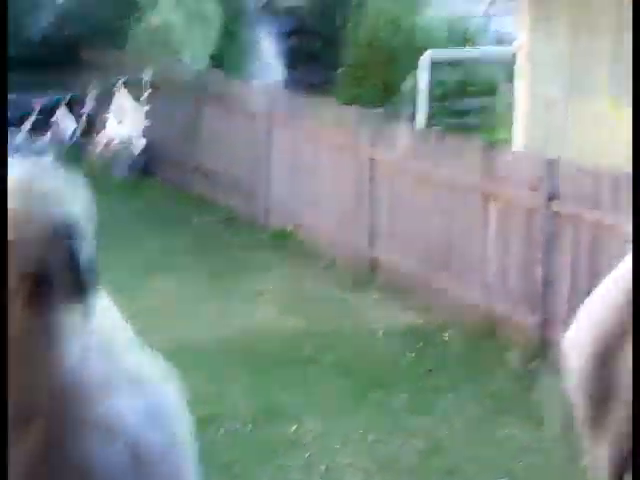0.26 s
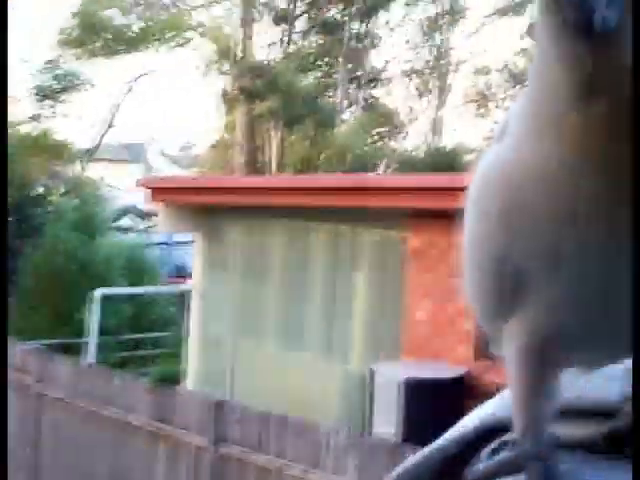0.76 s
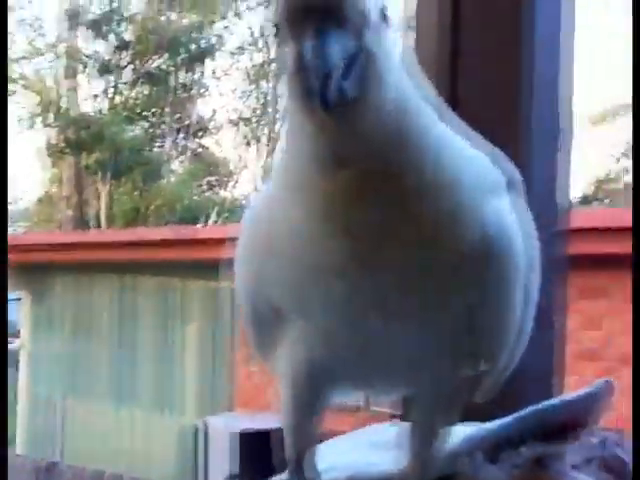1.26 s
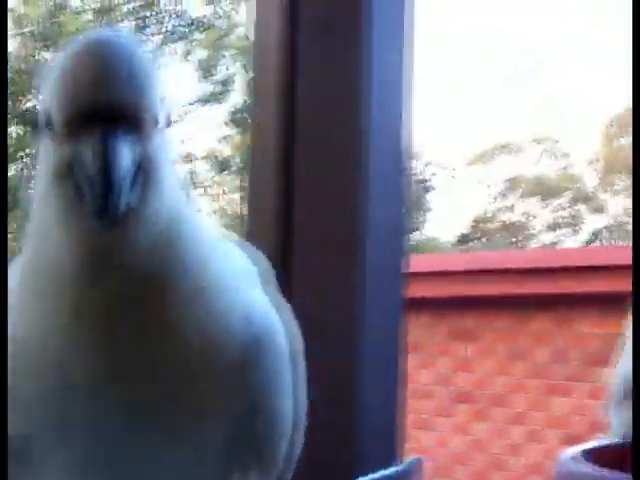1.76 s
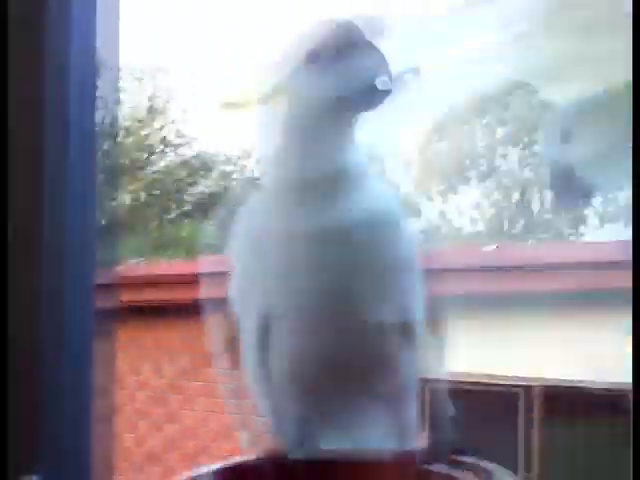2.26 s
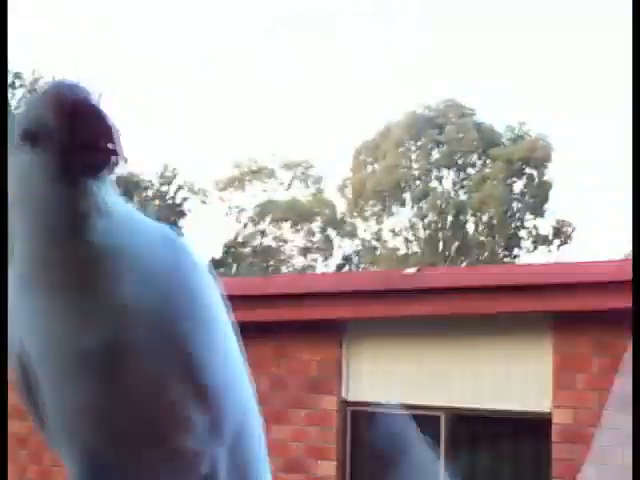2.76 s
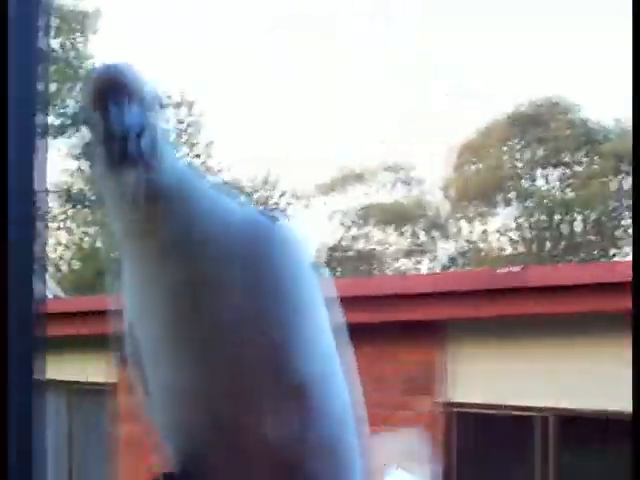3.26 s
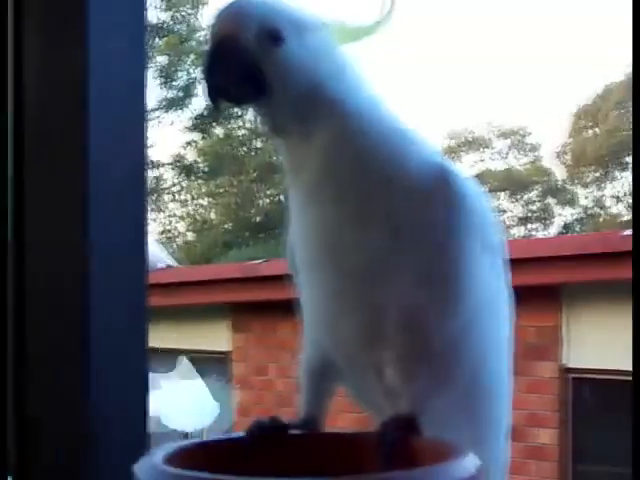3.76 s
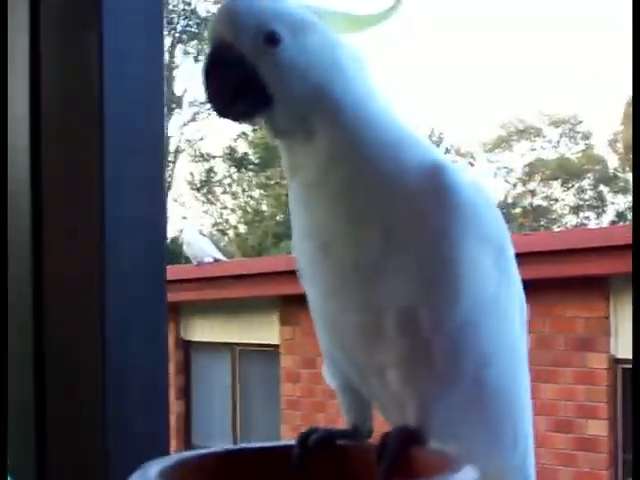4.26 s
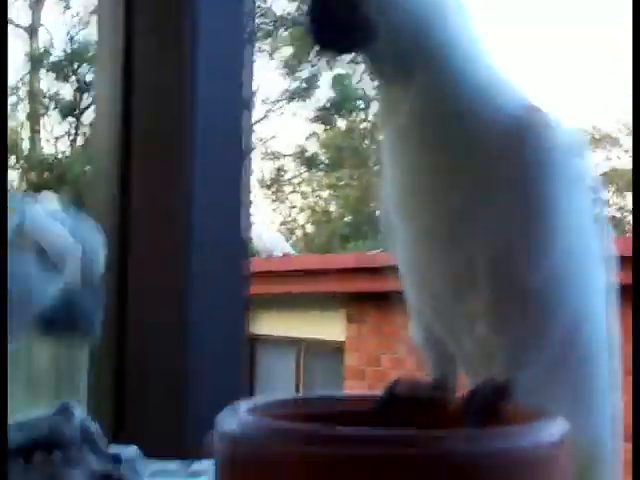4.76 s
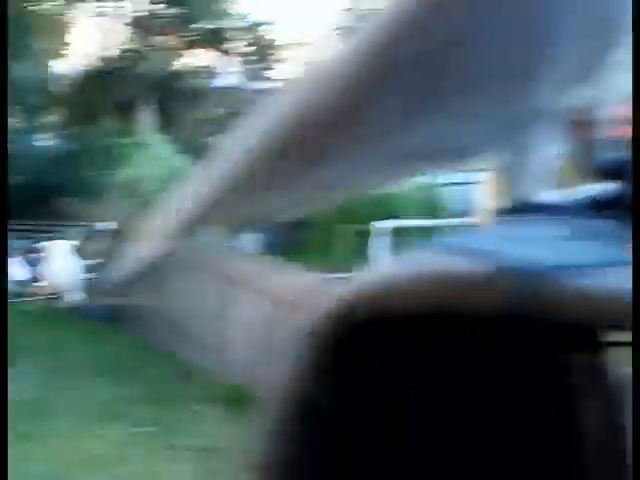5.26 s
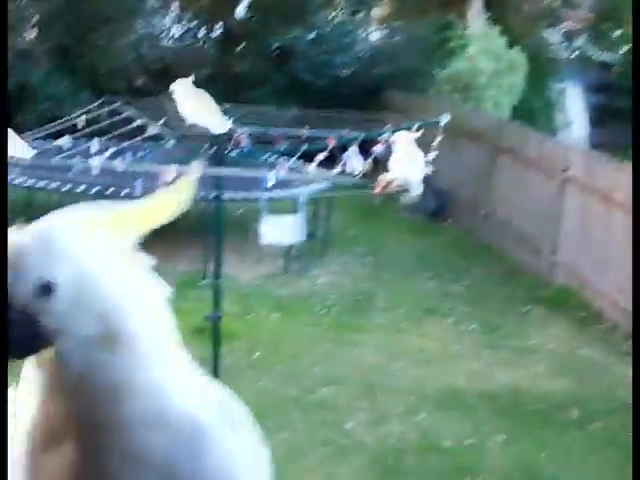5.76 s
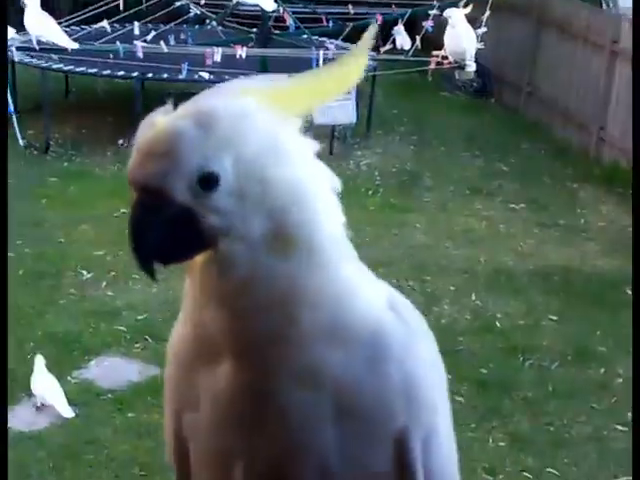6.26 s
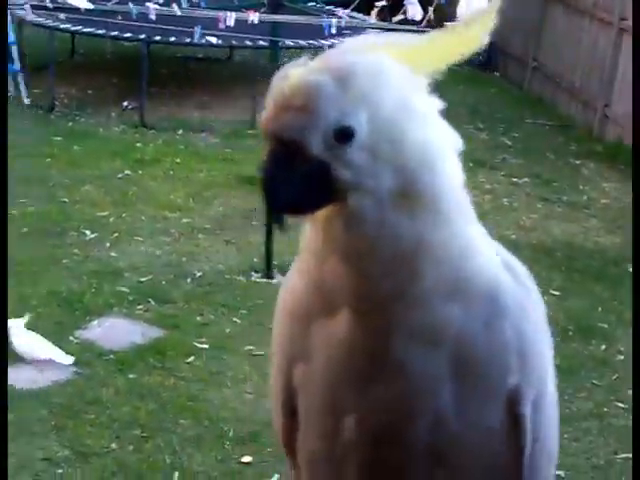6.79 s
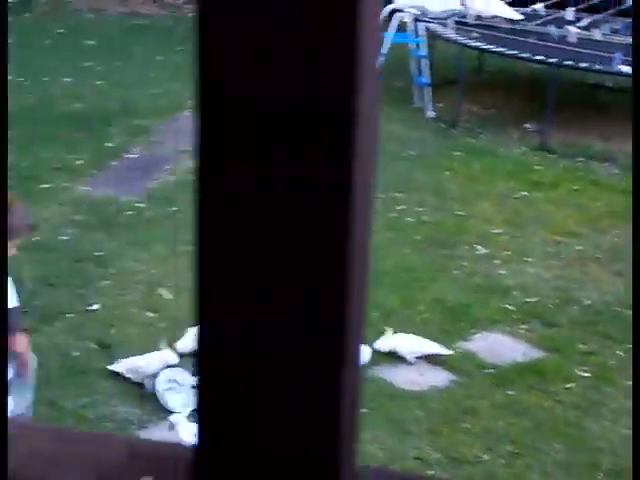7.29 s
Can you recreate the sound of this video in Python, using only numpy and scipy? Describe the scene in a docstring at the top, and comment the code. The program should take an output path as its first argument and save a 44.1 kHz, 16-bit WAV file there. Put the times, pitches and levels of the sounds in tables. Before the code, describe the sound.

Handheld, slightly dull microphone on an open veranda with a short echo. Soft feather rustle and low yard hum run throughout. Ticks and a bright pot strike lead to a single raspy cockatoo scream that overloads the input, then a big wing whoosh and fluttering air thuds. Quiet coos and thin chirps follow farther off, with light rail taps, before rattling, booming boards and rising wind close.

```python
"""Cockatoos on a timber veranda

A flock crowds above a yard. One screeches beside the microphone and overloads it: shaky pulses and breath
through a resonant throat. Boards bang three times as rattling and booming noise; claws, beaks, rail and pot
are struck resonances; wings are swells of noise, some shoving the diaphragm. A dove coos and small birds
chirp further off as gliding tones, over shaped noise for the flock's rustle, the yard's hum and light wind."""
import sys
import numpy as np
from scipy import signal
from scipy.fft import rfft, irfft
from scipy.io import wavfile
from scipy.ndimage import uniform_filter1d

SR = 44100
rng = np.random.default_rng(int(sys.argv[2]) if len(sys.argv) > 2 else 0)


def put_to_file(sound):
    """Save the sound as 16-bit audio at rate SR, in the file named by the first command-line argument."""
    columns = np.atleast_2d(sound).T  # one column per channel
    safe = np.clip(columns, -1, 1)
    whole_steps = np.round(safe * 32767)
    wavfile.write(sys.argv[1], SR, whole_steps.astype(np.int16))


N = 332070  # samples in the scene

# Colour of feathers, claws and boards brushing: [hz, level_db]
RUSTLE_COLOUR = [(500, -31), (900, -11), (1400, -11), (2200, -9.5), (3370, -4.5), (4860, -11),
                 (6700, -20.5), (12000, -24)]


def gain_of(db):
    """Turns decibels into an amplitude factor."""
    return 10 ** (np.asarray(db) / 20)


def clock(length_s):
    """Sample times of an event in seconds."""
    return np.arange(round(length_s * SR)) / SR


def evened(x):
    """Scales to rms 1."""
    return x / np.sqrt(np.mean(x ** 2) + 1e-20)


def smoothed(x, size, axis=-1):
    """Runs a moving average twice, a roughly triangular smoothing."""
    once = uniform_filter1d(x, size=size, axis=axis)
    return uniform_filter1d(once, size=size, axis=axis)


def wobble(count, seconds):
    """Random drift of rms 1: white noise smoothed over the given time."""
    size = max(round(seconds * SR), 1)
    return evened(smoothed(rng.standard_normal(count), size))


def read(points, hz):
    """Interpolates a table over frequency on a nearly logarithmic axis."""
    f, value = np.transpose(points)
    return np.interp(np.log(hz + 1), np.log(f + 1), value)


def coloured(x, points):
    """Filters by a spectrum table."""
    hz = np.fft.rfftfreq(len(x), 1 / SR)
    return irfft(rfft(x) * gain_of(read(points, hz)), len(x))


def resonate(x, hz, width_hz):
    """Shifts hz down to zero, smooths, and shifts back: a resonance of gain 1 that can glide."""
    turn = np.exp(2j * np.pi * np.cumsum(hz * np.ones(len(x))) / SR)
    r = np.exp(-np.pi * width_hz / SR)
    return 2 * (turn * signal.lfilter([1 - r], [1, -r], x / turn)).real


def resonate_twice(x, hz, width_hz, second_width_hz):
    """Passes two resonances in a row at one pitch, for steeper sides."""
    return resonate(resonate(x, hz, width_hz), hz, second_width_hz)


def add(mix, start_s, sound):
    """Mixes a sound in at its start time."""
    part = mix[max(round(start_s * SR), 0):][:len(sound)]
    part += sound[:len(part)]


def screech():
    """A syrinx driven to chaos: shaky pulses and breath through a throat that favours two overtones."""
    start_s, hold_s, full_db = 2.009, 0.17, 3.5  # held until it lets go
    attack_s, burst_db, swell_s = .007, -10.5, .045  # bursts in below full effort, then swells
    release_db_per_s, tail_db, tail_db_per_s = 649.5, -22, 218.5  # a rasp lingers under the release
    syrinx_hz, slack_hz, upper_hz, upper_db = 1064.3, 95.1, 3165, 5
    t = clock(hold_s + 0.17)
    after = np.maximum(t - hold_s, 0)
    slack = np.maximum(1 - t / swell_s, 0)
    hz = syrinx_hz - slack_hz * slack  # pitch tightens with the swell
    release_db = np.maximum(-release_db_per_s * after, tail_db - tail_db_per_s * after)
    effort_db = full_db + burst_db * slack + release_db
    turns = np.cumsum(hz * (1 + .08 * wobble(len(hz), .002))) / SR
    folds = sum(np.cos(2 * np.pi * k * turns) for k in range(2, 8))  # no fundamental
    folds = folds * gain_of(5.8 * wobble(len(hz), .0005))
    drive = evened(folds) + 1.5 * rng.standard_normal(len(hz))  # breath added
    throat = resonate_twice(drive, 2 * hz, 520, 520)
    throat -= gain_of(upper_db) * resonate_twice(drive, upper_hz, 700, 650)
    throat += gain_of(-12.0) * resonate(drive, 4200, 900)
    throat += gain_of(-6.5) * resonate(drive, 1200, 1400)
    attack = np.minimum(t / attack_s, 1) ** 2
    return start_s, attack * gain_of(effort_db) * evened(throat)


def bang(start_s, rattle_db, boom_db, t60_s):
    """Loose boards: a rattle with a ring in it, over a longer-lasting boom."""
    # Colour of the boom: [hz, density_db_per_hz]
    boom_colour = [(35, -26), (60, -24), (194, -6.5), (429, 4), (558, -6.5), (618, -4.5), (1030, -10),
                   (2000, -19), (2600, -47), (4400, -120)]
    t = clock(.5)
    noise = rng.standard_normal((2, len(t)))
    rattle = evened(coloured(noise[0], RUSTLE_COLOUR))
    rattle += gain_of(-7) * evened(resonate(rattle, 3060, 230))  # the boards ring here
    rattle *= gain_of(rattle_db - 60 * t / t60_s + 0.92 * wobble(len(t), 0.0014))
    boom = evened(coloured(noise[1], boom_colour)) * gain_of(boom_db - 60 * t / (1.84 * t60_s))
    return start_s, rattle * np.minimum(t / 0.0066, 1) + boom * np.minimum(t / 0.0031, 1)


def pot(start_s, peak_db, contact_s, hardness_db):
    """Gritty contact feeds the clay's modes; each answers broadly, then rings on thinly, its level wavering."""
    # Modes of the pot: [hz, level_db, t60_s]
    pot_modes = [(685, -3, 0.15), (1100, 18, 0.65), (1300, 7, 0.12), (2250, 7, .1), (3250, 6.5, 1),
                 (3280, 7, .2), (4330, -16, .15)]
    t = clock(.4)
    grit = rng.standard_normal(len(t)) * (t < contact_s) * gain_of(5.6 * wobble(len(t), 0.0051))
    grit[:20] += 3.7 * np.hanning(20)  # the first touch
    free = 0.00077 / contact_s  # a long scrape holds the ring down
    out = np.zeros(len(t))
    for hz, db, t60_s in pot_modes:
        long_ring = free * gain_of(-60 * t / t60_s + 6.1 * wobble(len(t), 0.0044))
        ring = (gain_of(-60 * t / 0.062) + long_ring) * np.sin(2 * np.pi * hz * t)
        tilt_db = hardness_db * np.log2(hz / 1068)
        out += gain_of(db + tilt_db) * signal.fftconvolve(grit, ring)[:len(t)]
    return start_s, gain_of(peak_db) * out / abs(out).max()


def gust(peak_s, level_db, eddy_hz, fall_db_per_s):
    """Wing beats push air at the diaphragm: slow eddies evened to similar force, then smoothed."""
    rise_db_per_s, hold_s = 600, 0.029
    t = clock(.35) - .08  # zero at the peak
    fall_db = -fall_db_per_s * np.maximum(t - hold_s, 0)
    level_db = level_db + np.minimum(rise_db_per_s * t, fall_db)
    eddies = resonate_twice(rng.standard_normal(len(t)), eddy_hz, 3.0 * eddy_hz, 1.7 * eddy_hz)
    eddies /= np.sqrt(smoothed(eddies ** 2, 900) + 1e-12)
    smooth = signal.lfilter(*signal.butter(3, 120, fs=SR), eddies)
    return peak_s + t[0], gain_of(level_db) * smooth * signal.windows.tukey(len(t), .15)


def tap(start_s, level_db, ring_hz, t60_s):
    """A tick of claw or beak: a scratch with a loose ring and a quieter tail."""
    t = clock(.2)
    noise = rng.standard_normal((2, len(t)))
    ring = evened(resonate_twice(noise[1], ring_hz, 0.38 * ring_hz, 0.38 * ring_hz))
    scratch = .5 * evened(coloured(noise[0], RUSTLE_COLOUR)) + ring
    decay = gain_of(-60 * t / 0.02) + .5 * gain_of(-60 * t / t60_s)
    return start_s, scratch * gain_of(level_db) * decay * np.minimum(t / 0.00019, 1)


def knock(start_s, blow_db, hardness_db, freedom):
    """A dull thud sets the modes of the rail ringing; harder blows favour the higher ones."""
    # Modes of the metal rail, free to ring: [hz, level_db, t60_s]
    rail_modes = [(647.4, -1.5, .25), (840, -0.5, 0.14), (1065, -6, .2), (1300, -2.5, 0.19),
                  (1740, -2.5, 0.21), (2210, -12.5, .2), (3040, -9, .2), (3330, -8, .15), (5000, -14.5, .2),
                  (5800, -16, 0.13)]
    t = clock(.25)
    hz, db, t60_s = np.transpose(rail_modes)[:, :, None]
    share_db = db + hardness_db * np.log2(hz / 630) + 1.3 * rng.standard_normal(hz.shape)
    decay_db = -60 * t / (t60_s * max(freedom, .05))
    modes = gain_of(share_db + decay_db) * np.sin(2 * np.pi * hz * t)
    thud = 0.84 * gain_of(-60 * t / 0.011) * np.sin(2 * np.pi * 1200 * t) * np.cos(2 * np.pi * 450 * t)
    return start_s, gain_of(blow_db) * (.5 * modes.sum(0) + thud)


def flap(peak_s, rustle_db, whoosh_db, whoosh_hz, length_s):
    """Air rushing through feathers: a soft, ragged swell of rustle and lower whoosh."""
    t = clock(.3) - .15  # zero at the peak
    noise = rng.standard_normal((2, len(t)))
    swell = np.exp(-.5 * (t / (length_s / 3)) ** 2)
    swell *= gain_of(2.7 * wobble(len(swell), 0.0049))
    rustle = evened(coloured(noise[0], RUSTLE_COLOUR))
    whoosh = evened(resonate_twice(noise[1], whoosh_hz, 1450, 1600))
    return peak_s - .15, swell * (gain_of(rustle_db) * rustle + gain_of(whoosh_db) * whoosh)


def coo(start_s, length_s, top_hz, last_hz, scoop_hz, level_db, roll_db, roll_at):
    """A dove's soft tone scoops up and sags late; where it rolls, a rough undertone sounds below it."""
    scoop_s, sag_power, fade_db = 0.0391, 2.6, -6
    under_db, roll_span, roll_duck = -12, 0.16, 0.33  # span as a share of the coo
    t = clock(length_s)
    place = t / length_s
    scoop = scoop_hz * np.maximum(1 - t / scoop_s, 0)
    hz = top_hz - scoop - (top_hz - last_hz) * place ** sag_power
    roll_db = roll_db * np.exp(-((place - roll_at) / roll_span) ** 2)
    level_db = level_db - roll_duck * roll_db + fade_db * place ** 4
    hz = hz * (1 + 0.012 * wobble(len(hz), 0.0078))
    tone = np.sin(2 * np.pi * np.cumsum(hz) / SR) * gain_of(2.9 * wobble(len(hz), .006))
    under = evened(resonate_twice(rng.standard_normal(len(hz)), hz - 110, 56, 56))
    voice = np.sqrt(2) * tone + gain_of(under_db + roll_db) * under
    return start_s, gain_of(level_db) * voice * signal.windows.tukey(len(hz), .15)


def chirp(start_s, length_s, first_hz, last_hz, level_db, fade_db, husky):
    """A small bird's gliding sine with a husky edge of narrow noise: quick rise, then a level slope."""
    rise_s, settle_power, width_hz = 0.0046, 1.6, 390  # the glide moves fastest at its start
    t = clock(length_s)
    hz = last_hz + (first_hz - last_hz) * (1 - t / length_s) ** settle_power
    tone = np.sqrt(2) * np.sin(2 * np.pi * np.cumsum(hz) / SR)
    edge = evened(resonate_twice(rng.standard_normal(len(hz)), hz, width_hz, width_hz))
    level = np.minimum(t / rise_s, 1) * gain_of(level_db + fade_db * t / length_s)
    return start_s, level * (tone + husky * edge) * signal.windows.tukey(len(hz), .1)


def veranda(x):
    """Echo of the veranda: sparse taps of random sign, each band dying at its own speed."""
    # Reverberation of the veranda: [hz, t60_s]
    echo_times = [(300, 0.13), (1000, 0.23), (2500, 0.36), (5000, 0.2), (9000, 0.29)]
    taps = np.zeros(SR // 2)
    at = np.arange(300, len(taps) - 20, 20)
    taps[at + rng.integers(0, 20, len(at))] = rng.choice([-1., 1.], len(at))
    hz, t, z = signal.stft(taps, SR, nperseg=256)
    decay = gain_of(-60 * t / read(echo_times, hz)[:, None])
    tail = signal.istft(z * decay, SR, nperseg=256)[1]
    return signal.fftconvolve(x, tail / np.linalg.norm(tail))[:N]


def hiss(points, patchy_db, flicker_db):
    """Noise from random short spectra, with small patches and flicker across all bands."""
    frames, hz = N // 128 + 5, np.fft.rfftfreq(512, 1 / SR)
    a, b, patches = rng.standard_normal((frames, 257, 3)).T
    patches = uniform_filter1d(uniform_filter1d(patches, size=3, axis=0), size=9, axis=1)
    flicker = evened(uniform_filter1d(rng.exponential(1, frames) - 1, size=4))
    level_db = read(points, hz)[:, None] + patchy_db * evened(patches) + flicker_db * flicker
    z = (a + 1j * b) * gain_of(level_db)
    return evened(signal.istft(z, nperseg=512, noverlap=384)[1][:N])


def air():
    """Rustle of the flock, far hum of the yard and wind on the microphone: three drifting noises."""
    # Drift of the background: [time_s, rustle_db, wind_db, yard_db]
    drift = [(0, -37.5, -37, -45.5), (.4, -43, -40.5, -48.5), (.78, -43.5, -44.5, -49.5),
             (1.1, -38.5, -40.5, -43), (1.45, -44.5, -42.5, -48.5), (1.8, -49.5, -48.5, -55),
             (2.27, -31.5, -37, -40.5), (2.6, -41.5, -41.5, -46.5), (2.9, -43.5, -44.5, -47.5),
             (3.3, -49, -46.5, -54.5), (4.601, -50, -49, -54), (4.9, -46, -47.5, -52.5),
             (5.3, -43, -44.5, -51.5), (5.74, -49, -46, -54), (6.1, -46.5, -45.5, -53),
             (6.64, -53.5, -43, -55), (7.04, -48.5, -49, -53.5), (7.2, -43, -35.5, -41.5),
             (7.53, -43.5, -34.5, -39)]
    # Colour of the yard's hum: [hz, density_db_per_hz]
    yard_colour = [(59, -25), (100, 1.5), (129, -2.5), (350, -6.5), (618, -3), (908, -10), (1750, -19.5),
                   (2420, -29.5), (3000, -11), (3900, -44.5), (6600, -120)]
    # Colour of the wind: [hz, density_db_per_hz]
    wind_colour = [(8.8, -23.5), (15, 7), (22, -11), (43, -3), (193, -17.5), (249, -19.5), (300, -20.5),
                   (390, -48), (660, -120)]
    time_s, *columns = np.transpose(drift)
    rustle_db, wind_db, yard_db = (np.interp(np.arange(N) / SR, time_s, c) for c in columns)
    rustle = gain_of(rustle_db) * hiss(RUSTLE_COLOUR, patchy_db=3.0, flicker_db=1.1)
    yard = gain_of(yard_db) * hiss(yard_colour, patchy_db=0.5, flicker_db=1.74)
    wind = evened(coloured(rng.standard_normal(N), wind_colour))
    return rustle + yard + gain_of(wind_db + 1.1 * wobble(N, 0.029)) * wind


def scene():
    """Near voice and taps with the veranda's echo, far birds wetter, dry wings and blows, and the air."""
    # Ticks of claws and beaks: [start_s, level_db, ring_hz, t60_s]
    tap_events = [(.483, -27, 3400, 0.12), (0.82, -28.5, 2450, 0.044), (1.084, -26.5, 3200, 0.0313),
                  (1.097, -26.5, 2080, 0.089), (1.153, -16, 2300, 0.14), (1.161, -24, 3040, 0.29),
                  (1.658, -40, 4095, .03), (2.386, -16.5, 3250, 0.1), (4.79, -46, 3200, .02),
                  (5.763, -39.5, 3130, 0.064), (6.467, -39.5, 2510, 0.048), (6.919, -39.5, 2880, 0.031),
                  (7.224, -34.5, 1880, .06)]
    # Feet on the metal rail: [start_s, blow_db, hardness_db_per_octave, freedom to ring 0-1]
    knock_events = [(1.851, -30, -7, 0.36), (1.895, -34, -0.5, 0.8), (4.68, -38, 5, 0.15),
                    (4.728, -32.5, -0.5, 0.27), (5.209, -33, -6, 0.3), (5.481, -34.5, -2.5, 0.9),
                    (6.907, -33.5, 0, 0.85), (6.964, -47, 7.5, 0.4)]
    # Dove: [start_s, length_s, top_hz, last_hz, scoop_hz, level_db, roll_db, roll_at 0-1 of the length]
    coo_events = [(.41, .125, 717, 650, 20, -52, 5, 0.4), (3.117, .17, 700, 648, 49, -49, 21, 0.43),
                  (3.556, 0.2, 746, 720, 185, -45.5, 5, 1), (3.726, .11, 733, 713, 5, -48.5, 31.5, 0.29),
                  (3.966, .48, 752, 520, 180, -45, 12, 0.31), (4.9, 0.19, 705, 530, 173, -46, 2, .7),
                  (5.368, 0.18, 783, 726, 18, -52.5, 2, 0.6), (5.698, 0.42, 784, 539, 18, -55, 21, .5)]
    # Small birds: [start_s, length_s, first_hz, last_hz, level_db, fade_db over the length, husky 0-1]
    chirp_events = [(.04, .085, 2800, 2760, -50, -4, 0.5), (0.122, .035, 2720, 2150, -46, -6, .1),
                    (1.551, 0.076, 4080, 3910, -46.5, -2, 0.8), (1.63, 0.086, 4150, 3880, -42, -14, 0.7),
                    (1.855, 0.11, 4200, 4310, -46, -15, 0.7), (2.974, 0.066, 3500, 3100, -48, -7, .15),
                    (3.105, .025, 3850, 3610, -32, -22, 0.96), (3.243, 0.073, 3650, 2865, -43.5, -8, 0.6),
                    (3.285, 0.035, 2560, 2570, -50, -1, .1), (3.312, 0.028, 3020, 2990, -45, -4, 0),
                    (3.356, 0.037, 1560, 1347, -56, 6, 0), (3.47, .06, 4330, 3810, -53, -5, .1),
                    (4.226, 0.081, 4220, 4160, -35, -25, 0.63), (4.237, 0.058, 4550, 4970, -39, -19.5, .6),
                    (4.753, 0.021, 5270, 5300, -37.5, -12, .6), (5.103, .05, 3670, 3470, -44, -10, .4),
                    (5.808, 0.11, 4050, 3500, -53.5, 2, .15)]
    # Wing strokes: [peak_s, rustle_db, whoosh_db, whoosh_hz, length_s]
    flap_events = [(0.012, -62, -66, 700, 0.067), (0.963, -38, -42, 920, 0.051),
                   (2.325, -24, -27.5, 386, 0.049), (2.561, -48, -43, 1294, 0.022),
                   (2.639, -35.5, -41, 690, 0.075), (2.714, -41, -49, 900, 0.07),
                   (2.799, -39.5, -40.5, 600, .05), (4.78, -39, -53, 700, 0.098),
                   (5.118, -41, -71, 900, 0.058)]
    # Pot scraped and pecked: [start_s, peak_db, contact_s, hardness_db_per_octave]
    pot_events = [(0.925, -29, 0.076, -27), (1.146, -8.5, 0.0087, 4.5)]
    # Wing beats on the diaphragm: [peak_s, level_db before smoothing, eddy_hz, fall_db_per_s]
    gust_events = [(2.319, -23, 8.2, 38), (2.654, -13, 54, 198), (2.718, -23.5, 53, 300),
                   (2.813, -22, 23, 500)]
    # Blows on the boards: [start_s, rattle_db, boom_db, t60_s of the rattle]
    bang_events = [(1.149, -18.5, -29.5, 0.2), (7.086, -34, -28.5, 0.44), (7.277, -22.5, -23.5, 0.46)]
    near, far, soft = np.zeros((3, N))
    add(near, *screech())
    layers = [(near, tap, tap_events), (near, knock, knock_events),
              (far, coo, coo_events), (far, chirp, chirp_events),
              (soft, flap, flap_events), (soft, pot, pot_events),
              (soft, gust, gust_events), (soft, bang, bang_events)]
    for mix, source, events in layers:
        for event in events:
            add(mix, *source(*event))
    wet = veranda(gain_of(-13) * near + gain_of(-6.0) * far)
    return (near + far + soft + wet + air())[None]


def record(dry):
    """A microphone dull above 7 kHz, an input stage that clips softly, a small offset, the band limit."""
    # Response of the microphone: [hz, gain_db]
    mic_response = [(7000, 0), (7600, -18), (8200, -32), (9000, -10), (11500, -15), (13000, -40)]
    # Response after the clipping: [hz, gain_db]
    output_response = [(4000, -0.5), (7000, -5.5), (10000, -11.5), (13000, -6.5), (15500, -18)]
    heard = coloured(dry[0], mic_response)
    knee = 5  # higher bends more abruptly
    clipped = heard / (1 + abs(heard) ** knee) ** (1 / knee)
    shifted = gain_of(-0.15) * coloured(clipped, output_response) + .0088  # constant offset
    band_limit = signal.firwin(511, 15570, window=("kaiser", 9), fs=SR)  # low-pass edge in Hz
    return signal.oaconvolve(shifted, band_limit, "same")[None]


dry = scene()
out = record(dry)
put_to_file(out)
```